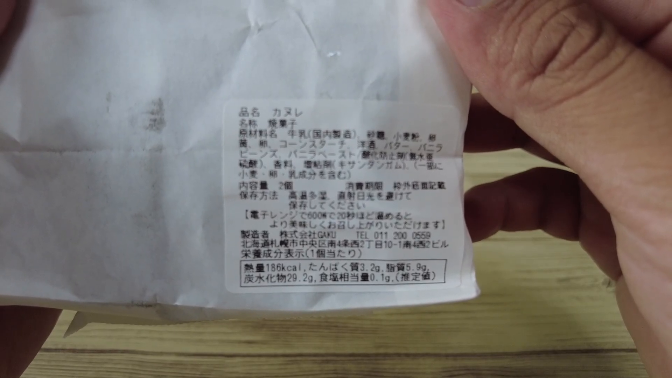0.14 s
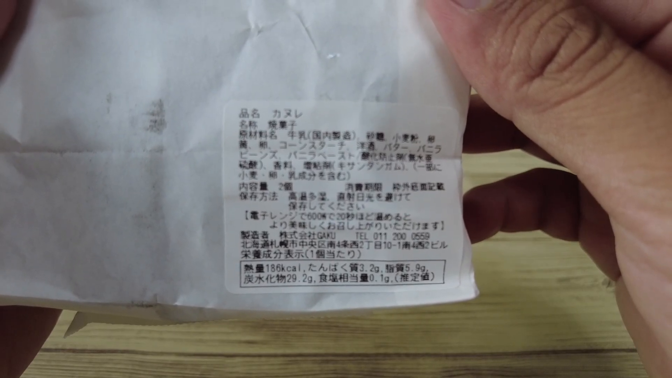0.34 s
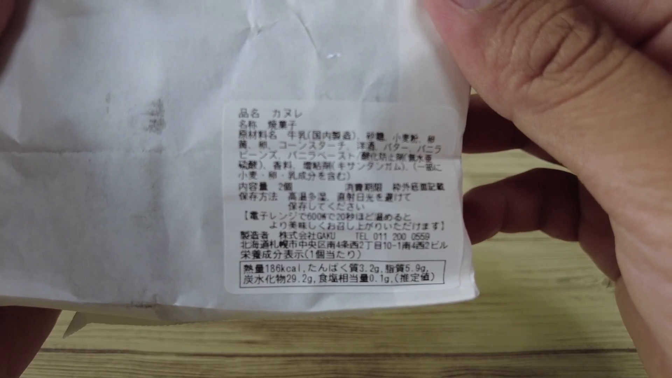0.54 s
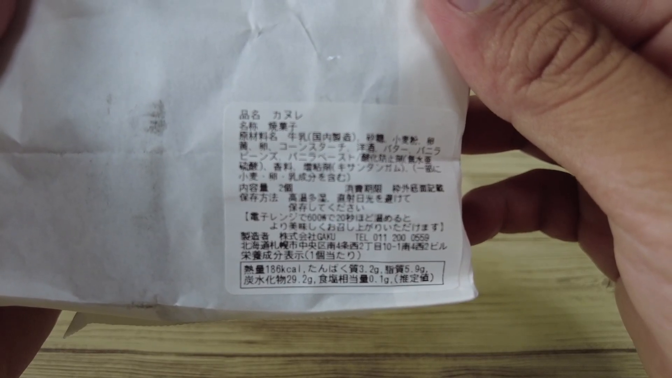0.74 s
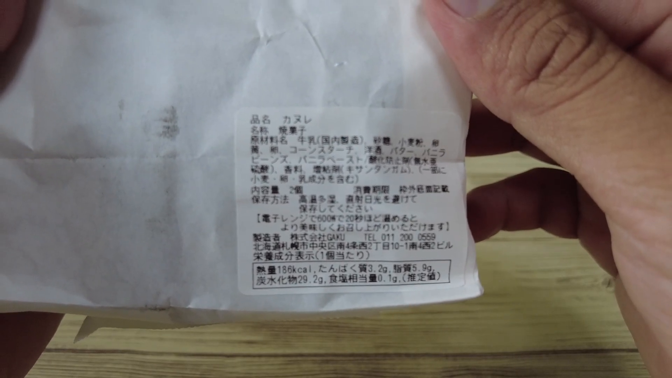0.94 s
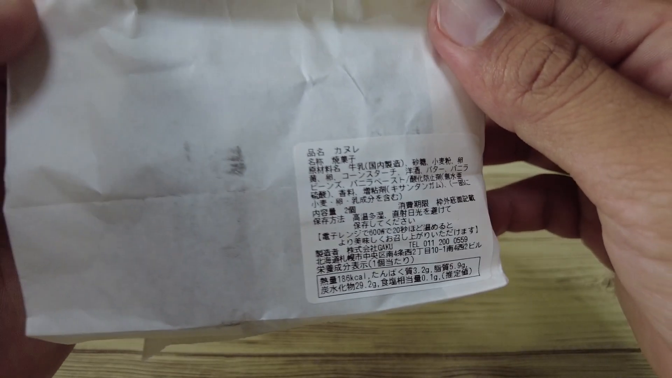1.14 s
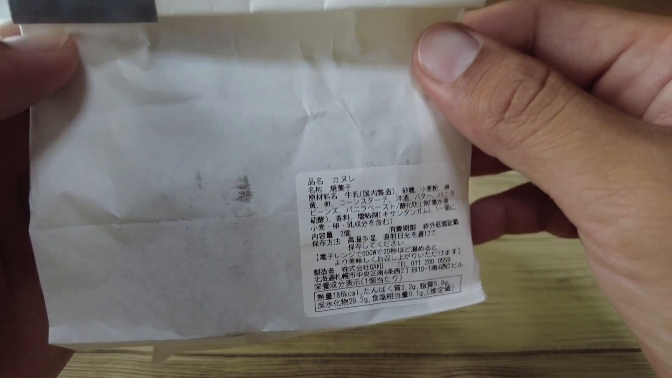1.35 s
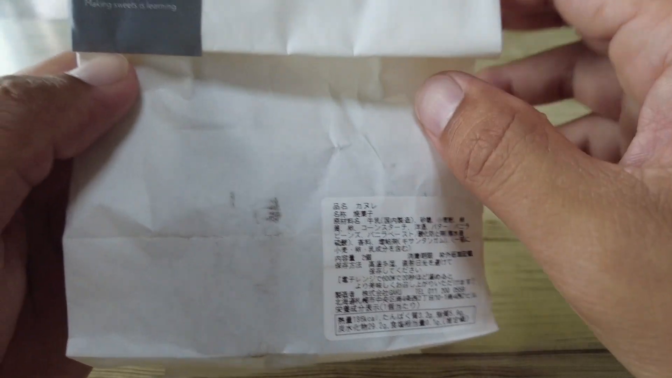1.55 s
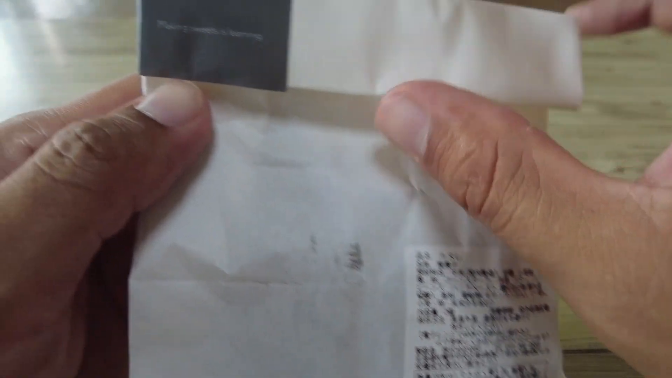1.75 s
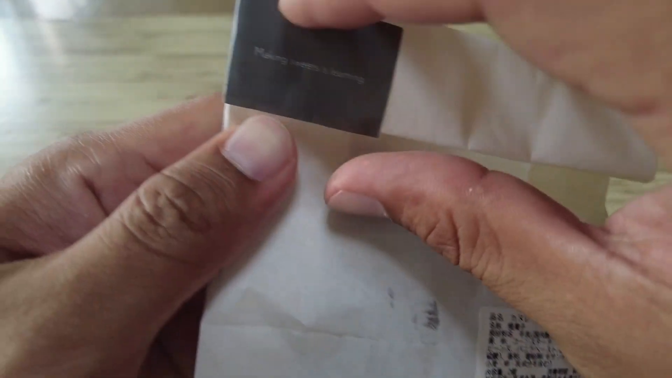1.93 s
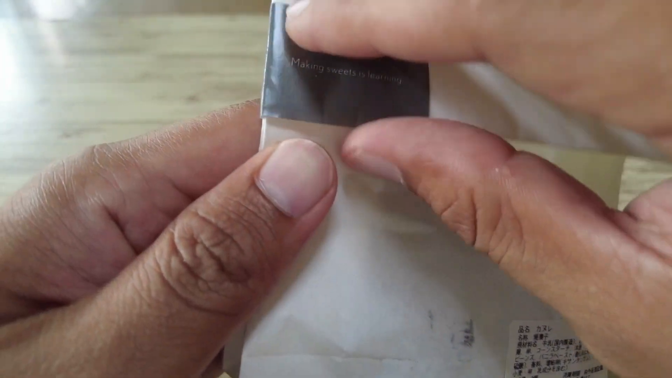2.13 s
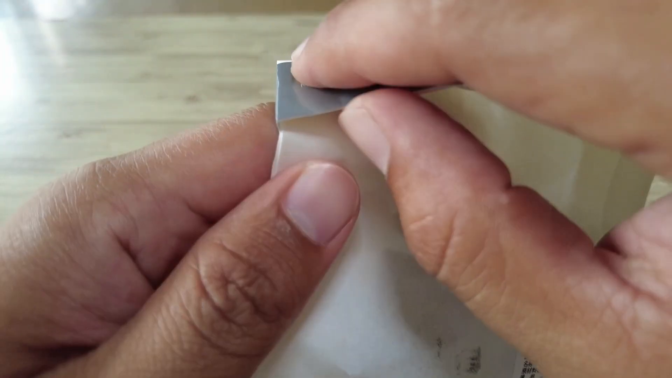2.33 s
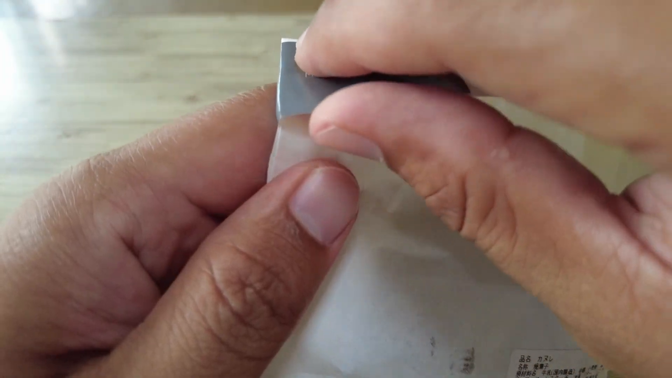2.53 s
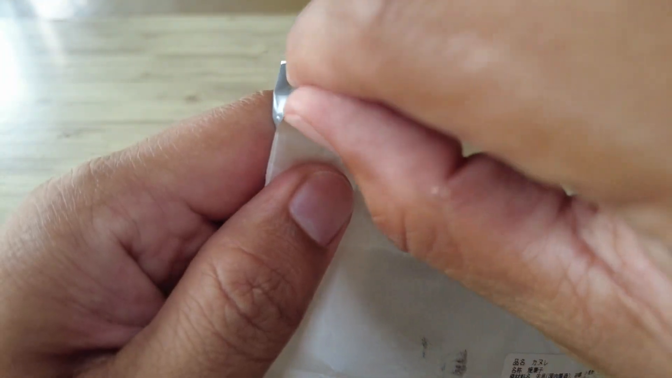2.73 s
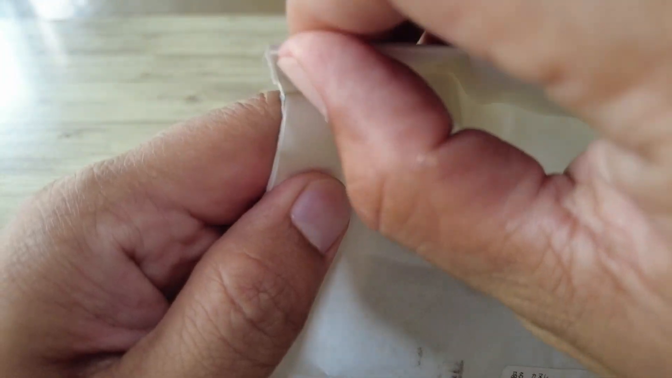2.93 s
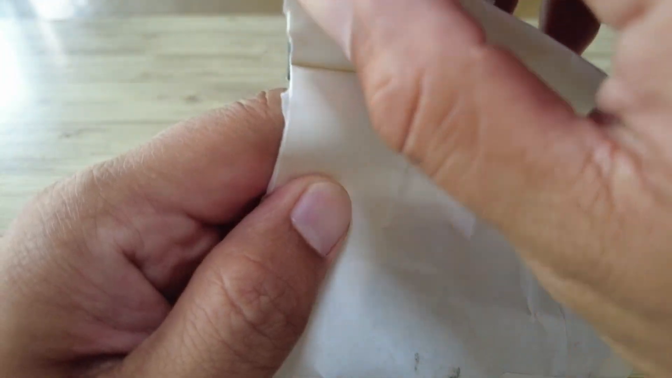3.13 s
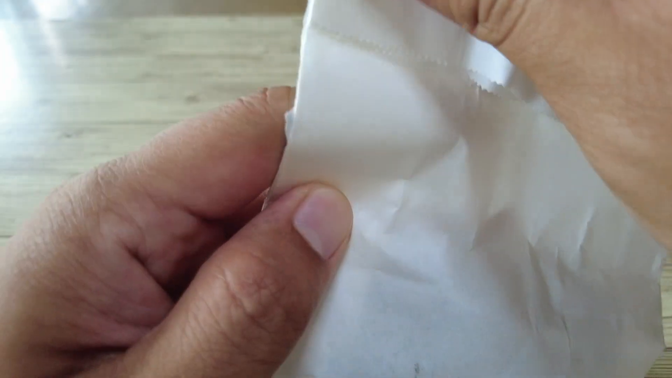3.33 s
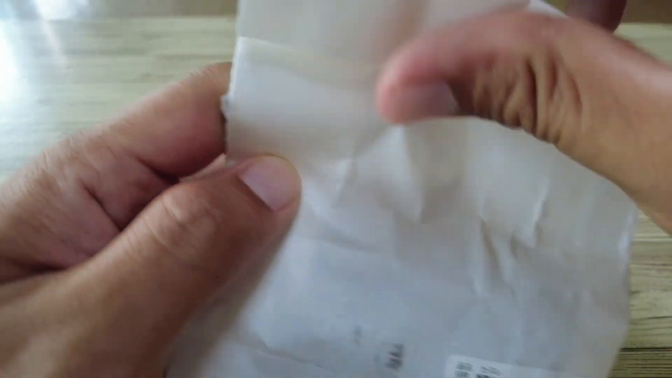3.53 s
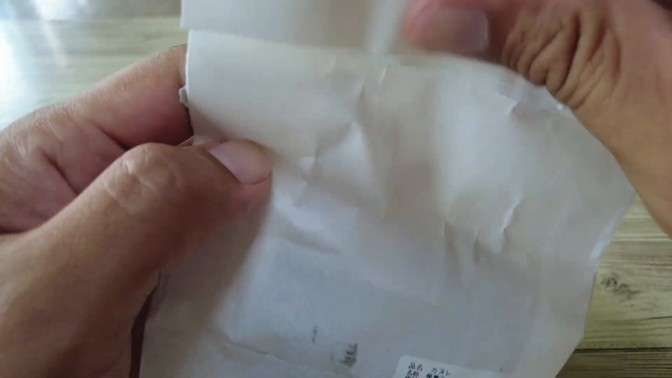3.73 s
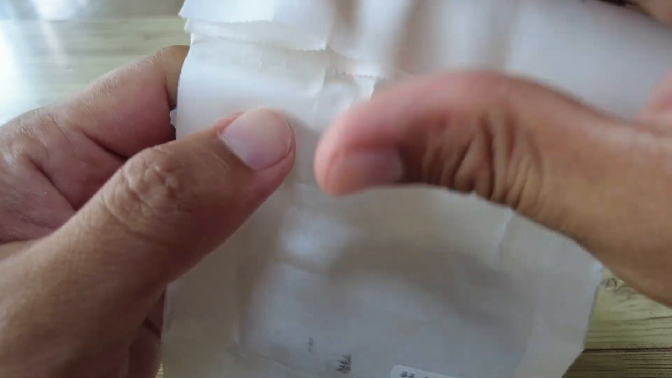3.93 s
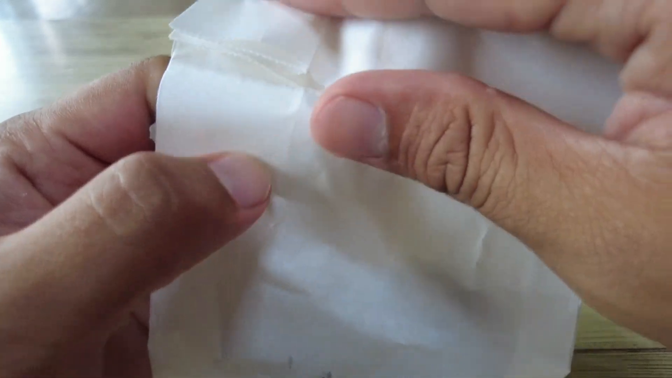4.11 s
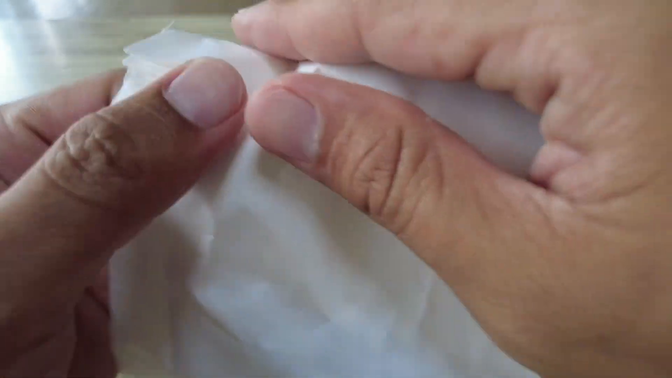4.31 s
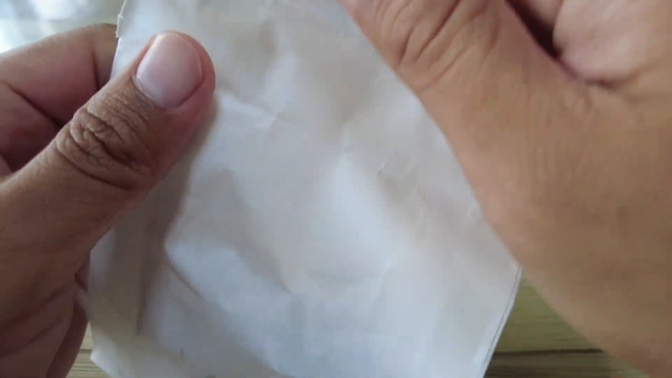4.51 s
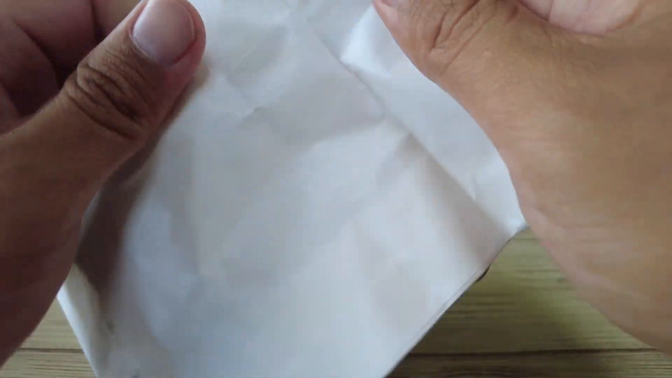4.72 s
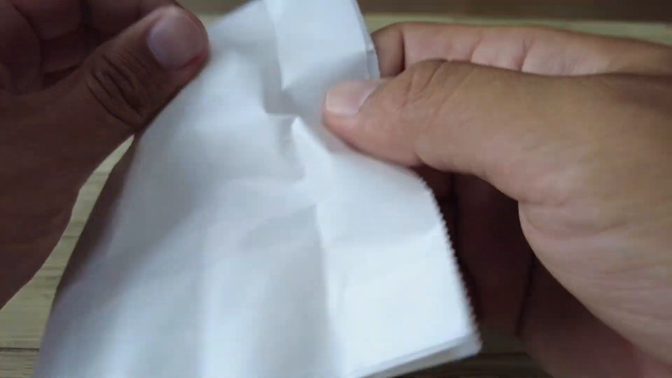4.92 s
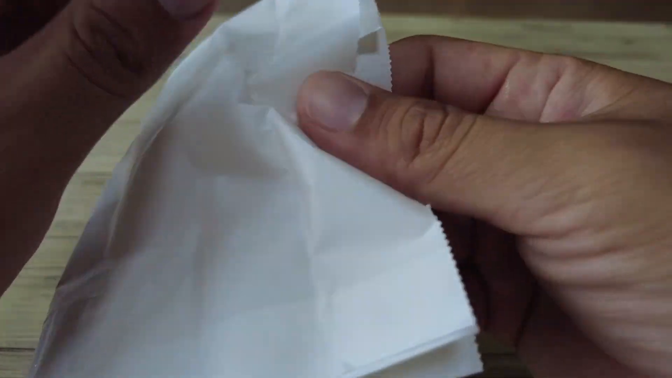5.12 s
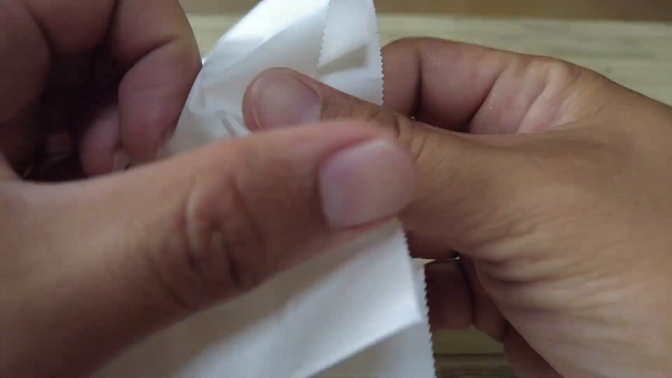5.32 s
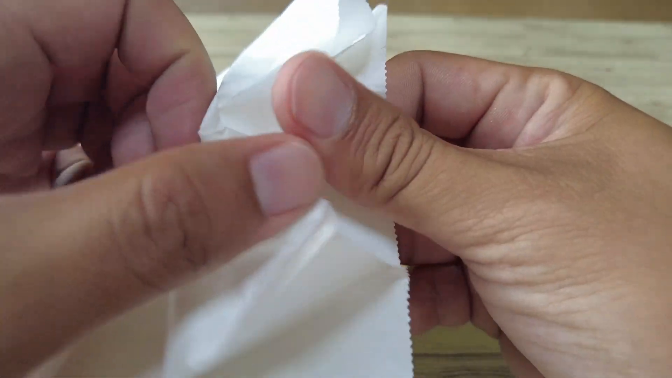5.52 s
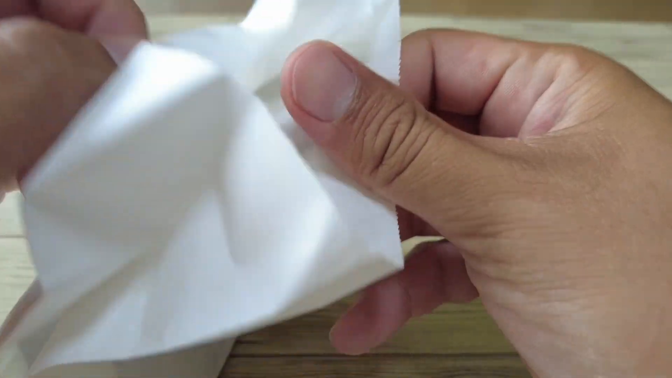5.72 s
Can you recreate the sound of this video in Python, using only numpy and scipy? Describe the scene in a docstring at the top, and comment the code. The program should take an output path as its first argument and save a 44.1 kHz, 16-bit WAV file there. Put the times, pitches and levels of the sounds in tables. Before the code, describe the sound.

Hands turn, unfold and open a small paper bag close to a stereo microphone. After a moment of low room hum, a few light crinkles begin. They grow into dense, irregular, dry snaps and crackles, with a grainy rustle of fingers sliding over the paper. Now and then a side of the bag pops with a soft hollow thump. The crinkling goes on to the end over a faint rumble.

```python
"""Creases of a small paper bag buckle with dry snaps as two hands turn, unfold and open it.
Each snap is an impulse that excites damped modes of the nearest facet, the sheet, the wall and the
enclosed air; now and then a side pops in or out with a hollow thump. Friction of the fingers gives a
grainy rustle and one thin squeak. A stereo microphone stands close by; the quiet room hums and rumbles."""
import sys
import numpy as np
from scipy import signal
from scipy.fft import rfft, irfft
from scipy.io import wavfile

SR = 44100
rng = np.random.default_rng(int(sys.argv[2]) if len(sys.argv) > 2 else 0)


def output_pcm(signal):
    """Save a mono or channel-first signal as 16-bit PCM at the path in sys.argv[1].

    Samples are clipped to [-1, 1] before scaling.
    """
    pcm = np.clip(np.atleast_2d(signal).T, -1, 1) * 32767
    wavfile.write(sys.argv[1], SR, np.round(pcm).astype(np.int16))


N = 258426

# loudest creases: (time [s], facet energy [dB], facet mode [Hz], crack [dB re facet], wall [dB re facet])
CREASES = [(.958, -41, 2480, -20, -26), (1.012, -30, 2560, -4, -2), (1.036, -42, 2800, -10, -15),
           (1.105, -32, 2900, -2, -15), (1.1656, -22.5, 1400, -29, 4.5), (1.39, -30, 2520, -25, 12),
           (1.4029, -16, 2760, -33, 0), (1.413, -23, 3000, -25, -13), (1.463, -26, 2490, -22, 5),
           (1.4776, -15, 3570, -0.5, -.5), (1.5377, -17.5, 1660, -29, -19), (1.549, -22.5, 2170, -30, -0.5),
           (1.625, -14.5, 1690, -12, -5), (1.6752, -18.5, 2920, -36, -26), (1.8811, -18.5, 2740, -4.5, -3),
           (1.8846, -9.5, 4040, -34, -36), (1.9161, -15, 3250, -7, -17), (1.9546, -22.5, 2430, -29, -11),
           (2.064, -11, 1530, -13, -1.5), (2.0871, -10, 2700, -5.5, -15), (2.1039, -9.5, 1810, -23, -4.5),
           (2.1143, -5, 3020, -6, -16), (2.119, -9.5, 2140, -5, -4), (2.172, -7.5, 2430, -1.5, -25),
           (2.1773, -4, 1850, -6.5, -10), (2.1927, -16, 2000, -10, -3), (2.2471, -4, 2200, -2.5, -22),
           (2.2576, -16, 1850, -3, 2), (2.2997, -6.5, 3430, -10.5, -2), (2.404, -8, 3240, -7.5, -14),
           (2.455, -26, 2850, -5, -22), (2.477, -34.5, 2500, 2, -20), (2.637, -11, 3100, 5.5, -7),
           (2.7523, -13.5, 1770, -26, -26), (2.7582, -9.5, 2580, -1.5, -23), (2.7864, -8.5, 2070, -11, -6),
           (2.79, -16, 1720, 12, 6), (2.8027, -24, 3860, 11, -3), (2.842, -14.5, 1710, -18, -13),
           (2.863, -2, 2190, -1.5, -10), (2.9136, -14.5, 1640, -12, -10), (2.927, -16.5, 2850, -16, -23),
           (2.979, -6.5, 2300, -10, 1), (3.0505, -15.5, 3900, -17, -4), (3.184, -9.5, 1310, -4, -3),
           (3.2188, -3.5, 2000, -19, -2), (3.232, 7, 1450, -14.5, -7.5), (3.2436, -9, 2160, -22, -6.5),
           (3.27, -9, 1710, -32, -27), (3.3155, -18, 2100, 3.5, -23), (3.3341, -6, 2540, -7, -38),
           (3.3771, -21.5, 2960, 1.5, -3), (3.4921, -11.5, 1880, -28, -0.5), (3.5465, -11, 2900, -30, -29),
           (3.5515, -15, 2850, -26, -25), (3.6145, -6.5, 1370, -13, -14), (3.665, -14.5, 2650, -0.5, -3.5),
           (3.7547, -10, 1880, -29, -0.5), (3.7689, -13.5, 2400, -11, 2), (3.8295, -8.5, 1280, -28, -5),
           (3.8631, -10.5, 3330, 2.5, -1), (3.882, -13, 2230, -9, -2), (3.9323, -16, 2070, -2, -32),
           (4.0234, -18.5, 2000, -16, 0.5), (4.0842, -7.5, 2720, -21, -8.5),
           (4.1149, -12.5, 1590, -20, -20), (4.1409, -11.5, 1560, -33, -3), (4.2334, -16.5, 2310, -24, -7),
           (4.25, -5, 3140, -37, 2), (4.311, -13, 3400, -5, -14), (4.3202, -13.5, 1340, -28, -2.5),
           (4.3552, -9.5, 3780, -10, -1), (4.4223, -13.5, 2820, -17, -26), (4.4682, -11.5, 3360, 0, -0.5),
           (4.4819, -15.5, 1700, -29, 0), (4.5332, -10, 1820, -28, -6), (4.551, -10.5, 3020, -23, -26),
           (4.6134, -8.5, 2780, 4, -4), (4.6179, -11.5, 3020, -12, 1), (4.6425, -2, 4400, -2, -28),
           (4.6903, -9, 3020, -14, -9), (4.6947, -13, 3560, -14, -27), (4.768, -11, 2600, 9, -9),
           (4.7753, -10.5, 2170, -4, -5), (4.8049, -11.5, 3230, 6.5, -13), (4.8366, -15.5, 2740, 3.5, -12),
           (4.8638, -8.5, 2280, -1, -12), (4.8688, -9, 2950, -7, -22), (4.9258, -10, 1850, -8, -32),
           (4.9789, -11.5, 1570, -25, -5.5), (5.0475, -11.5, 1540, -4, -11), (5.1655, -17, 1460, -15, -8),
           (5.1731, -11, 1770, -1, -2.5), (5.18, -20, 2130, -3, -25), (5.204, -14.5, 3300, 2.5, 1),
           (5.2845, -10, 4000, 7, -28), (5.2933, -3.5, 3900, -3, -13), (5.2996, -8.5, 2390, 6.5, -22),
           (5.3167, -26, 2720, 10, -16), (5.3627, -13, 3270, 2.5, 0), (5.373, -6, 1620, -3.5, -7.5),
           (5.3995, -14, 4770, 0, -19), (5.4847, -7.5, 1150, -31, -38), (5.5006, -15.5, 1700, -31, -0.5),
           (5.583, -29, 1300, -25, 10.5), (5.6394, -20.5, 1960, 5.5, -20), (5.705, -14, 2680, -8, 3),
           (5.7284, -14.5, 3820, 1.5, -0.5), (5.746, -12.5, 1260, -21, 0), (5.761, -8.5, 1500, -26, -27),
           (5.7786, -4.5, 3080, -3, -10), (5.7823, -6, 2670, -9, -28), (5.8014, -11, 4470, -8, -23),
           (5.8109, -11.5, 2030, -6, -3.5), (5.8539, -6, 1740, -11, -35)]
# modes of the stiff sheet: (frequency [Hz], t60 [s], level [dB re facet mode])
SHEET_MODES = [(1078, 0.0064, -19), (1670, 0.0057, -7), (3050, 0.0036, -7.5), (4090, 0.0042, -10)]
# spectrum of breaking fibres: (frequency [Hz], relative density [dB])
FIBRE_SPECTRUM = [(5500, 6.5), (7500, 4), (9100, 2), (10000, 1), (10800, 0), (13600, -1.5), (15600, -3),
                  (16500, -19.5)]
# position of the hands: (time [s], lag of the left channel [samples])
HAND_LAG = [(.9, 1), (3.0, 0.67), (4.8, 0.27), (5.2, -1.1), (5.86, -1.2)]
# a side pops in or out: (time [s], peak level [dB], air resonance [Hz])
SIDE_POPS = [(1.09, -32.5, 210), (1.384, -30.5, 268), (1.916, -34.5, 234), (2.299, -17, 258),
             (2.9782, -33.5, 450), (3.1829, -30.5, 231), (3.22, -26, 390), (3.3334, -21.5, 286),
             (3.4915, -30.5, 454), (3.854, -24.5, 174), (4.012, -31.5, 135), (4.1648, -24.5, 212),
             (4.2502, -24, 193), (4.455, -27.5, 305), (4.7668, -27.5, 240), (4.802, -29, 135),
             (5.7142, -26.5, 200), (5.7454, -30.5, 363), (5.8019, -29, 168)]
# sliding fingers: (start [s], length [s], level [dB], treble [dB re level], facet pitch [Hz])
FINGER_STROKES = [(1.004, 0.01, -58, -1.5, 2000), (1.08, 0.01, -50.5, -3, 2680),
                  (1.171, 0.099, -59.5, -4, 2900), (1.338, 0.063, -57, -3.5, 3100),
                  (1.452, 0.2, -59, -1.5, 2600), (1.903, 0.063, -54.5, -4, 2520),
                  (2.035, 0.012, -40.5, -7, 3000), (2.13, 0.046, -61, 5, 2500),
                  (2.166, 0.1, -47, -5.5, 2140), (2.378, 0.088, -55.5, -6.5, 3030),
                  (2.63, 0.033, -53.5, -1.5, 2190), (2.794, 0.031, -42, 1, 5500),
                  (2.883, 0.12, -50, -5, 1750), (3.05, 0.034, -41, -3, 4220),
                  (3.148, 0.026, -51.5, 0.5, 1900), (3.222, 0.024, -45, -0.5, 1800),
                  (3.283, 0.12, -53, -6.5, 2100), (3.478, .14, -49, -1.5, 2000),
                  (3.654, 0.057, -58.5, -1, 2630), (3.771, 0.078, -45, -1.5, 2760),
                  (3.89, 0.081, -65.5, 6, 2920), (4.02, 0.11, -54.5, -4, 2500),
                  (4.164, 0.093, -62, -2, 2200), (4.311, 0.14, -44.5, -3, 2900),
                  (4.46, 0.014, -50, -4, 2600), (4.517, .06, -66, -2, 2500), (4.601, 0.085, -49, 4, 3100),
                  (4.684, 0.041, -63, -7, 3000), (4.769, 0.18, -43, 0, 2820), (5.063, 0.026, -43, -4, 4650),
                  (5.106, 0.033, -66, -9, 2800), (5.164, 0.049, -43, -12, 2040),
                  (5.279, 0.066, -41.5, -4.5, 3270), (5.373, 0.026, -47, -6, 2900),
                  (5.502, 0.037, -39, -5.5, 5000), (5.612, 0.11, -42.5, -7.5, 4000),
                  (5.726, 0.14, -55.5, -0.5, 2600)]
# facet resonances under the fingers: (frequency [Hz], width scale [Hz], gain [dB])
FACET_BANDS = [(1620, 400, -8), (2880, 200, -13), (4440, 100, -7.5), (5560, 370, -13)]
# the grip flexes the whole bag: (time [s], level [dB])
GRIP_FLEX = [(.9, -71), (1.05, -57.5), (1.25, -57), (1.6, -57), (1.8, -58), (2.15, -55), (2.3, -54.5),
             (2.55, -61), (2.8, -57), (3.0, -54.5), (3.23, -46.5), (3.42, -54.5), (3.82, -47.5),
             (3.98, -56), (4.15, -47), (4.47, -50.5), (4.65, -52), (4.93, -51), (5.02, -55), (5.1, -54.5),
             (5.25, -50), (5.47, -53), (5.72, -45.5), (5.86, -43.5)]
# skin on glossy paper: (time [s], frequency [Hz], level [dB])
SQUEAK_CURVE = [(1.15, 11500, -95), (1.18, 12150, -78), (1.21, 12450, -79), (1.26, 12300, -83),
                (1.35, 12150, -79), (1.4, 11900, -75), (1.43, 12050, -80), (1.45, 12100, -100)]
# room noise: (frequency [Hz], relative density [dB])
ROOM_SPECTRUM = [(12, -51), (20, 4), (33, -8.5), (53, -11.5), (130, -18.5), (200, -26), (242, -23.5),
                 (285, -30), (678, -34), (1130, -47), (1260, -36), (2230, -52.5), (13000, -69)]
# likeness of left and right in the room: (frequency [Hz], correlation [0..1])
ROOM_CORRELATION = [(60, 0.98), (300, 0.89), (640, 0), (3000, 0.51), (15000, 0.0)]
# hands and table shake the microphone: (time [s], level [dB])
HANDLING_RUMBLE = [(0.0, -48.5), (0.42, -54), (0.93, -48.5), (1.13, -49), (1.57, -47.5), (3.1, -52),
                   (3.23, -52), (3.39, -52), (3.95, -44.5), (4.47, -44.5), (4.68, -64), (4.81, -47),
                   (5.14, -52), (5.71, -50), (5.86, -44)]

WALL_HZ, WALL_T60_S = 700, .018
AIR_HZ, AIR_T60_S = 298, 0.031
SLIPS_PER_S, HANDS_START_S = 7000, GRIP_FLEX[0][0]


def crease_snaps(creases, burst_s=0.00058, crack_s=.0005, push_s=0.00059, facet_t60_cycles=9.6):
    """Buckling: a millisecond burst cracks fibres and rings the damped modes of paper, wall and air."""
    size, lead = 2048, 400
    t, out = (np.arange(size) - lead) / SR, np.zeros((2, N + size))
    noise = rng.standard_normal((len(creases), 3, size))
    chance = rng.standard_normal((len(creases), 5))
    # a faint noise swells for a few milliseconds just before each snap
    lead_in = from_db(-19) * np.exp(-np.abs(t) / 0.0052)
    settle = from_db(-17) * np.exp(-np.abs(t) / 0.0042)   # neighbouring facets settle after the jump
    skirt = np.where(t < 0, lead_in, settle)
    for (s, db, hz, crack_db, wall_db), white, draw in zip(creases, noise, chance):
        direction, wall_detune, facing, aside, air_detune = draw
        burst = white[0] * (np.exp(-(t / burst_s) ** 2) + skirt)
        facet = rms_one(ring(burst, hz, facet_t60_cycles / hz))
        facet += sum(from_db(mode_db) * rms_one(ring(burst, f, t60)) for f, t60, mode_db in SHEET_MODES)
        crack = fibre_treble(pair(white[1], white[2], .75) * (np.exp(-(t / crack_s) ** 2) + skirt))
        push = np.sign(direction) * np.gradient(np.exp(-(t / push_s) ** 2))
        wall = ring(push, WALL_HZ * np.exp(0.12 * wall_detune), WALL_T60_S)
        air = ring(push, AIR_HZ * np.exp(.25 * air_detune), AIR_T60_S)
        tilt = pair(np.ones(1), np.tanh(facing), .84)   # the near wall faces one channel more
        parts = [(facet, 0), (crack, crack_db), (wall * tilt, wall_db), (air * tilt, wall_db - 5.5)]
        snap = sum(from_db(db + rel_db) * rms_one(part) / np.sqrt(size) for part, rel_db in parts)
        lag = np.interp(s, *np.transpose(HAND_LAG)) + aside
        path_difference = lambda f: np.exp(-1j * np.pi * f * lag / SR * np.array([[1], [-1]]))
        at = round(s * SR) - lead
        out[:, at:at + size] += coloured(snap, path_difference)
    return out[:, :N]


def small_creases(rub_gain, count=80, over_rub_db=24):
    """Random buckling: rows like CREASES, whose energy grows with the rubbing of the moment."""
    s, draw = rng.uniform(HANDS_START_S, N / SR, count), rng.standard_normal((count, 4))
    db = 20 * np.log10(rub_gain[(s * SR).astype(int)]) + over_rub_db + 3.5 * draw[:, 0]
    facet_hz = 2100 * np.exp(0.34 * draw[:, 1])
    crack_db, wall_db = -25 + 5 * draw[:, 2], -12 + 5 * draw[:, 3]
    return list(zip(s, db, facet_hz, crack_db, wall_db))


def fibre_treble(x):
    """Spectral shaping: the excitation takes on the bright spectrum of breaking fibres."""
    highpass = signal.butter(3, 5500, "high", fs=SR, output="sos")
    return signal.sosfilt(highpass, coloured(x, lambda f: from_db(at_hz(FIBRE_SPECTRUM, f))))


def side_thumps():
    """Cavity resonance: a popping side gives the enclosed air a soft push, and it rings down."""
    out, pulse = np.zeros(N), np.hanning(round(0.0011 * SR))
    for s, db, hz in SIDE_POPS:
        push = np.zeros(N)
        push[round(s * SR):][:len(pulse)] = pulse
        air = ring(push, hz, 1.06 * AIR_T60_S)
        out += from_db(db) * air / np.abs(air).max()
    return out


def finger_envelopes(rise_db_per_s=448, fall_db_per_s=243, rest_hz=2030):
    """Superposition: strokes rise, hold and fade; their gains add and weight the mean facet pitch."""
    t, flex_gain = np.arange(N) / SR, from_db(in_time(GRIP_FLEX)[0])
    rub_gain = flex_gain * from_db(-19.5)   # resting fingers rustle faintly
    hiss_gain, weighted_log_hz = rub_gain * from_db(-6.5), rub_gain * np.log(rest_hz)
    for s, length, db, treble_db, hz in FINGER_STROKES:
        before_s, after_s = np.maximum(s - t, 0), np.maximum(t - s - length, 0)
        gain = from_db(db - rise_db_per_s * before_s - fall_db_per_s * after_s)
        rub_gain += gain
        hiss_gain += gain * from_db(treble_db)
        weighted_log_hz += gain * np.log(hz)
    return rub_gain, hiss_gain, flex_gain, np.exp(weighted_log_hz / rub_gain)


def fibre_slips(per_s, spread_db=3.4, clump_db=2.0):
    """Shot noise: fibres slip at random instants, in uneven impulses that swell in clumps."""
    slipping = rng.random((2, N)) < per_s / SR
    sizes = from_db(spread_db * np.minimum(rng.exponential(1, (2, N)), 5))
    signs = rng.choice([-1, 1], (2, N))
    return pair(*(slipping * sizes * signs), 0.29) * from_db(clump_db * drift(32))


def finger_rustle(rub_gain, hiss_gain, flex_gain, press_hz, octave_loss_db=20):
    """Sliding friction: slips excite the facets near press_hz, hiss in the treble and flex the bag."""
    slips = fibre_slips(SLIPS_PER_S)
    facets = 0.49 * band(slips, 570, 7500)
    for hz, width_hz, db in FACET_BANDS:
        near_db = -octave_loss_db * np.log2(press_hz / hz) ** 2
        resonance = band(slips, hz - 2 * width_hz, hz + 1.83 * width_hz)
        facets += from_db(db + near_db + 2.5 * drift(11)) * resonance
    ridge_slips = fibre_slips(3.9 * SLIPS_PER_S)   # skin ridges give far finer slips
    fine = fibre_treble(rms_one(ridge_slips) + 2 * rms_one(slips))
    lower = signal.sosfilt(signal.butter(2, 10000, fs=SR, output="sos"), fine)
    hiss = lower * from_db(1.5 * drift(12)) + (fine - lower) * from_db(1.5 * drift(34))
    shove = fibre_slips(SLIPS_PER_S)
    flex = 1.03 * rms_one(ring(shove, WALL_HZ, WALL_T60_S))
    flex += 1.12 * rms_one(band(shove, 162, 454)) + 0.61 * rms_one(band(shove, 257, 1620))
    fade_in = np.clip((np.arange(N) / SR - HANDS_START_S) / 0.11, 0, 1)
    return fade_in * (rub_gain * rms_one(facets) + hiss_gain * rms_one(hiss) + flex_gain * rms_one(flex))


def skin_squeak(upper_ratio=1.055, upper_db=-3):
    """Frictional oscillation: two wavering tones of skin on paper; the upper fades as the pitch sags."""
    hz, db = in_time(SQUEAK_CURVE)
    phase = 2 * np.pi * np.cumsum(hz * (1 + .002 * drift(40))) / SR
    upper = from_db(upper_db) * np.clip((hz - 12000) / 300, 0, 1) * np.sin(upper_ratio * phase)
    amplitude = np.sqrt(2) * from_db(db + 3 * drift(25)) * (db > -95)
    return amplitude * (np.sin(phase) + upper)


def room_noise(rumble_below_hz=100):
    """Partial coherence: steady noise, most alike in the bass; its lowest part swells with handling."""
    mid, side = rng.standard_normal((2, N))
    density = lambda f: from_db(at_hz(ROOM_SPECTRUM, f))
    correlation = lambda f: np.clip(at_hz(ROOM_CORRELATION, f), 0, 1)
    mid = coloured(mid, lambda f: density(f) * np.sqrt(1 + correlation(f)))
    side = coloured(side, lambda f: density(f) * np.sqrt(1 - correlation(f)))
    steady = from_db(-45.5) * rms_one(mid + side * [[1], [-1]])
    bass = signal.sosfiltfilt(signal.butter(2, rumble_below_hz, fs=SR, output="sos"), steady)
    rumble = from_db(in_time(HANDLING_RUMBLE)[0]) * rms_one(bass) * from_db([[-1.2], [1.2]])
    return steady - bass + rumble


def from_db(db):
    """Amplitude ratio of a level in dB."""
    return 10 ** (np.asarray(db) / 20)


def rms_one(x):
    """Normalisation to unit rms."""
    return x / np.sqrt(np.mean(x ** 2) + 1e-20)


def in_time(rows):
    """Linear interpolation of each column over time, one value per sample."""
    s, *columns = np.transpose(rows)
    return [np.interp(np.arange(N) / SR, s, c) for c in columns]


def at_hz(points, hz):
    """Interpolation of a spectrum on a log-frequency axis."""
    frequencies, values = np.transpose(points)
    return np.interp(np.log(hz), np.log(frequencies), values)


def band(x, lo_hz, hi_hz):
    """Butterworth band-pass."""
    return signal.sosfilt(signal.butter(2, [lo_hz, hi_hz], "band", fs=SR, output="sos"), x)


def drift(rate_hz):
    """Random modulation: low-passed noise of unit rms."""
    r = np.exp(-80 * np.pi * rate_hz / SR)   # double pole, one step per 40 samples
    slow = signal.lfilter([1], [1, -2 * r, r * r], rng.standard_normal(N // 40 + 2002))[2000:]
    return np.interp(np.arange(N) / 40, np.arange(len(slow)), rms_one(slow))


def ring(x, hz, t60):
    """A damped harmonic oscillator driven by x."""
    r, w = from_db(-60 / (t60 * SR)), 2 * np.pi * hz / SR
    return signal.lfilter([np.sin(w)], [1, -2 * r * np.cos(w), r * r], x + 1e-18)


def pair(mid, side, alike):
    """Mid-side stereo: left and right from a shared and an opposed signal; alike runs from 0 to 1."""
    return np.sqrt((1 + alike) / 2) * mid + np.sqrt((1 - alike) / 2) * side * np.array([[1], [-1]])


def coloured(x, gain):
    """Linear filtering: the spectrum is multiplied by gain(Hz)."""
    hz = np.maximum(np.arange(x.shape[-1] // 2 + 1) * SR / x.shape[-1], 1)
    return irfft(rfft(x) * gain(hz), x.shape[-1])


def scene():
    """Superposition of bag, fingers and room."""
    rub_gain, hiss_gain, flex_gain, press_hz = finger_envelopes()
    bag = crease_snaps(CREASES) + crease_snaps(small_creases(rub_gain)) + side_thumps()
    fingers = finger_rustle(rub_gain, hiss_gain, flex_gain, press_hz) + skin_squeak()
    return bag + fingers + room_noise()


def record(dry):
    """Band limiting: an elliptic low-pass cuts steeply above 16150 Hz."""
    return signal.sosfilt(signal.ellip(10, 1, 70, 16150, fs=SR, output="sos"), dry)


dry = scene()
out = record(dry)
output_pcm(out)
```